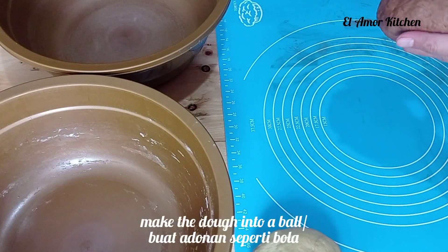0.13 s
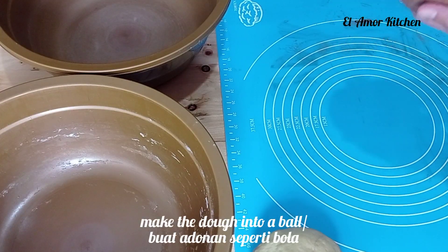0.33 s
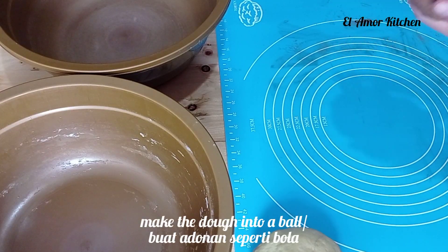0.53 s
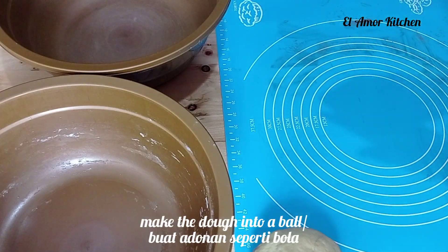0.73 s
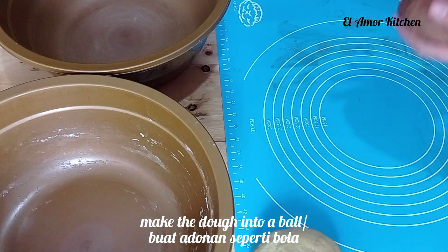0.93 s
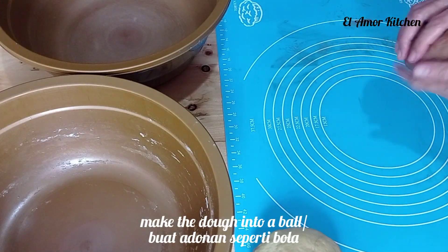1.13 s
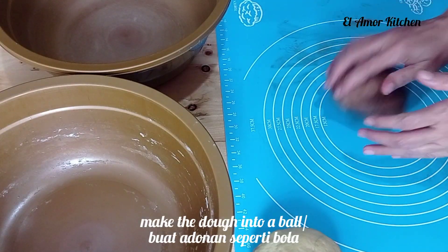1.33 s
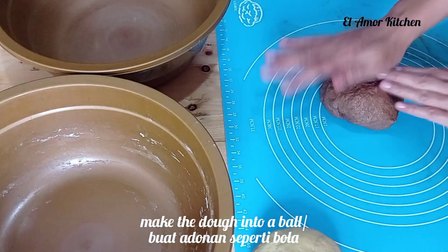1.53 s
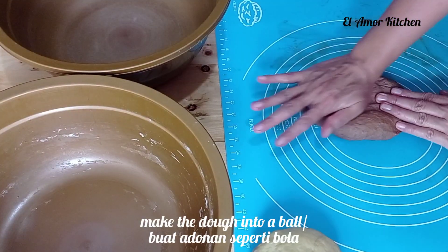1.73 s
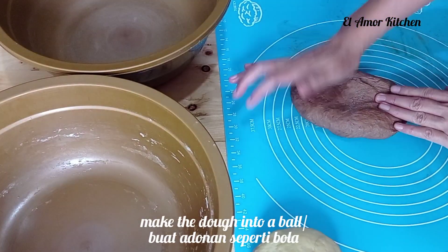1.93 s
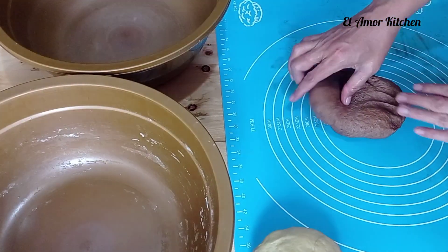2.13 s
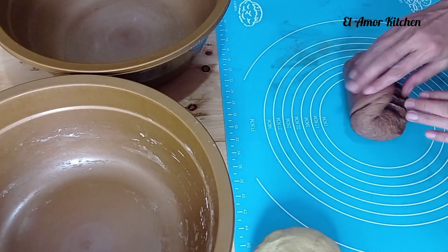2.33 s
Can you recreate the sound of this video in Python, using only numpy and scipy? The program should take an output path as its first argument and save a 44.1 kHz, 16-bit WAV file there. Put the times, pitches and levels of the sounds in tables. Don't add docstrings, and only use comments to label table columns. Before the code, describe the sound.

A soft ball of dough drops onto a silicone mat with a dull smack and woody thud

```python
import sys
import numpy as np
from scipy import signal
from scipy.fft import rfft, irfft, next_fast_len
from scipy.io import wavfile
from scipy.ndimage import uniform_filter1d, map_coordinates

SR = 44100
rng = np.random.default_rng(int(sys.argv[2]) if len(sys.argv) > 2 else 0)


def level_to_linear(level):
    exponent = np.asarray(level, float) / 20
    return 10 ** exponent


def bounce(signal):
    frames = np.transpose(np.atleast_2d(signal))
    limited = np.clip(frames, -1, 1)
    pcm = np.round(limited * 32767).astype(np.int16)
    wavfile.write(sys.argv[1], SR, pcm)


N = 108794
TIME_S = np.arange(N) / SR


def unit(x):
    return x / np.sqrt(np.mean(x ** 2) + 1e-20)


def along(points, hz):
    f, v = np.transpose(points)
    return np.interp(np.log(hz + 1), np.log(f + 1), v)


def filtered(x, response):
    m = next_fast_len(len(x) + 8192)
    return irfft(rfft(x, m) * response(np.fft.rfftfreq(m, 1 / SR)), m)[:len(x)]


def resonant(x, peaks):
    def response(f):
        total = 0
        for k, (centre, width, db) in enumerate(peaks):
            damping = 1j * f * width
            total = total + (-1) ** k * level_to_linear(db) * damping / (centre * centre - f * f + damping)
        return total
    return filtered(x, response)


def hiss(spectrum):
    return unit(filtered(rng.standard_normal(N), lambda hz: level_to_linear(along(spectrum, hz))))


def wobble(rate):
    knots = rng.standard_normal(int(N * rate / SR) + 4)
    return map_coordinates(knots, [np.arange(N) * rate / SR])


def strike(s, rise_s, t60):
    t = np.maximum(TIME_S - s, 0)
    return (1 - np.exp(-t / rise_s)) * level_to_linear(-60 * t / t60)


def swell(s, half_s):
    return np.exp(-((TIME_S - s) / half_s) ** 2)


def streaky(x, depth_db):
    z = signal.stft(x, nperseg=512)[2]
    field = rng.standard_normal(z.shape)
    field = uniform_filter1d(uniform_filter1d(field, 2, 0), 16, 1)
    return signal.istft(z * level_to_linear(depth_db * unit(field)), nperseg=512)[1][:N]


# f/Hz, width/Hz, level/dB
HUM = [(148.5, 6, -65.5), (241.6, 4, -83), (494, 2.6, -72), (2845, 26, -94.5), (1750, 220, -99)]
# t/s, f/Hz, level/dB
WHINE = [(.55, 1650, -100), (.7, 1800, -87), (.85, 1900, -84), (1.0, 1950, -106), (2.1, 1400, -104),
         (2.2, 1500, -90), (2.3, 1550, -102)]
# f/Hz, level/dB (per Hz)
AIR = [(30, -47), (76, -17.5), (150, -7.5), (392, -17.5), (560, -19.5), (900, -32), (3000, -40.5),
       (8000, -51), (13000, -61)]


def kitchen():
    hum = np.zeros(N)
    for hz, width_hz, db in HUM:
        tone = 1.88 * np.sin(2 * np.pi * hz * TIME_S + 1.24 * wobble(4.39))
        band = unit(resonant(rng.standard_normal(N), [(hz, width_hz, 0)]))
        hum += level_to_linear(db) * unit(tone + band)
    s, hz, db = np.transpose(WHINE)
    level = level_to_linear(np.interp(TIME_S, s, db)) * wobble(350)
    pitch = np.interp(TIME_S, s, hz) + 160 * wobble(150)
    whine = level * np.sin(2 * np.pi * np.cumsum(pitch) / SR)
    air_db = -67 + 0.7 * wobble(7.8)
    return hum + whine + level_to_linear(air_db) * unit(streaky(hiss(AIR), depth_db=2.5))


# t/s (middle), level/dB, half length/s, f/Hz
SLIDES = [(0.024, -59, 0.0086, 251), (0.146, -71.5, 0.0072, 7500), (0.154, -75.5, 0.013, 5420),
          (0.203, -86.5, 0.032, 2810), (0.212, -69, .04, 83.6), (0.673, -83, .01, 5640),
          (0.676, -81, 0.0074, 7320), (0.71, -86, 0.014, 4800), (.725, -88, .012, 5660),
          (0.795, -77, .012, 6770), (0.817, -91, 0.094, 5140), (0.805, -82.5, 0.078, 1860),
          (0.872, -92, 0.037, 2950), (1, -65, 0.024, 428), (1.26, -72, 0.045, 750),
          (1.727, -76, 0.043, 1250), (1.777, -86, 0.07, 1704), (1.843, -58, 0.029, 261.5),
          (1.918, -77, 0.0088, 7100), (1.931, -78, 0.019, 3934), (1.923, -77, 0.016, 5900),
          (1.963, -60.5, 0.034, 333), (1.972, -78, 0.062, 883), (1.968, -76, 0.032, 1696),
          (1.977, -76, 0.011, 3950), (2.004, -80, 0.057, 2760), (2.054, -87, .02, 4050),
          (2.078, -67, 0.04, 85), (2.069, -66.5, 0.0056, 1299), (2.166, -81, 0.031, 1406),
          (2.208, -76, 0.029, 1523), (2.213, -83.5, 0.037, 3920), (2.195, -84, 0.017, 8900)]


def slides():
    rough, flutter_db = 0.09, 4.5
    out = np.zeros(N)
    for s, db, half_s, hz in SLIDES:
        rate = 40 + hz * rough
        pitch = hz * (1 + rough * 0.5 * wobble(rate))
        level = level_to_linear(db + flutter_db * wobble(rate / 2)) * swell(s, half_s)
        out += level * np.sin(2 * np.pi * np.cumsum(pitch) / SR)
    return out


# f/Hz, T60/s
KITCHEN = [(100, 0.61), (500, 0.72), (2000, 0.56), (5000, 0.57), (9000, 0.46), (14000, 0.31)]


def room(x):
    wall_s = 0.003
    hz, t, z = signal.stft(rng.standard_normal(SR), SR, nperseg=256)
    decay = level_to_linear(-60 * t / along(KITCHEN, hz)[:, None])
    tail = signal.istft(z * decay, SR, nperseg=256)[1]
    delayed = np.pad(x, (round(wall_s * SR), 0))
    return signal.fftconvolve(delayed, tail / np.linalg.norm(tail))[:N]


def wash(s, spectrum, peaks=()):
    blow = np.zeros(N)
    blow[round(s * SR)] = SR
    tail = filtered(room(blow), lambda hz: level_to_linear(along(spectrum, hz)))
    if len(peaks):
        tail = tail + 1.805 * resonant(tail, peaks)
    return tail * strike(s, 0.0015, t60=SR)


# t/s, level/dB, f/Hz, T60/s
TICKS = [(0.0256, -60, 5300, 0.0096), (0.344, -76, 3660, 0.014), (.635, -63, 4400, 0.011),
         (.652, -73, 5500, .008), (0.67, -59.5, 5670, 0.0078), (0.704, -71.5, 5290, 0.015),
         (0.7737, -71, 8800, 0.011), (0.792, -62.5, 5420, 0.016), (1.789, -64, 6500, 0.018),
         (1.915, -65, 5800, 0.01), (1.949, -55, 8800, 0.012), (1.963, -56, 6350, 0.012),
         (2.196, -68, 6500, 0.014), (2.278, -74, 6650, 0.0093)]
# t/s (middle), level/dB, half length/s, f/Hz (centre), body level/dB
BRUSHES = [(0.152, -74.5, 0.015, 6800, -11), (0.348, -85.5, 0.021, 6000, -5),
           (0.513, -77, 0.019, 6500, -15), (0.71, -83.5, 0.077, 5500, -3), (0.77, -90, .025, 14800, -28),
           (0.782, -77, 0.021, 7600, -9), (1.274, -84, 0.18, 7800, -17), (1.736, -82, 0.043, 6500, 10),
           (1.816, -85, 0.043, 6500, -3), (1.937, -77, 0.019, 6500, 7.5), (1.958, -65.5, 0.021, 6300, 0),
           (1.981, -76, 0.058, 6500, 9), (2.22, -84, 0.067, 6500, 1.5), (2.285, -83, 0.026, 7200, -1)]
# f/Hz, level/dB (per Hz)
BRUSH_BODY = [(150, 4), (350, 3), (900, -0.5), (1100, -18), (4000, -12), (6000, -37)]
# f/Hz, width/Hz, level/dB
SQUEAK = [(1180, 90, -5), (1730, 60, -5), (1940, 70, -8), (2840, 90, -4), (4020, 170, 1), (5210, 90, 0),
          (6530, 250, -10), (600, 80, 0)]


def fingers():
    out = np.zeros(N)
    for s, db, half_s, hz, body_db in BRUSHES:
        band = [(hz, hz / 1.55, 0)]
        rub = rng.standard_normal(N)
        for _ in range(3):
            rub = resonant(rub, band)
        rub = unit(rub) + level_to_linear(body_db) * hiss(BRUSH_BODY)
        out += level_to_linear(db + 3.5 * wobble(370)) * swell(s, half_s) * rub
    for s, db, hz, t60 in TICKS:
        narrow = resonant(rng.standard_normal(N), [(hz, hz / 14, 0)])
        tone = strike(s, 0.0021, t60) * unit(resonant(narrow, [(hz, hz / 8, 0)]))
        snap = 0.5 * strike(s, 0.00026, 0.012) * hiss(PAT)
        out += level_to_linear(db + 1.0) * (tone + snap)
    squeak = resonant(rng.standard_normal(N), SQUEAK)
    squeak = unit(resonant(squeak, [(hz, width_hz * 2, 0) for hz, width_hz, db in SQUEAK]))
    out += level_to_linear(-71) * swell(1.306, 0.059) * squeak
    return out + level_to_linear(-14) * room(out)


# f/Hz, level/dB, T60/s
TABLE = [(92.1, 2.5, 0.22), (120.1, -1.5, 0.43), (161.6, -6, 0.8), (222, -12.5, 0.25), (240, -15, 0.88),
         (309.4, -10, 0.45), (333.2, -0.5, 0.19), (404, -5.5, 0.27), (540, -36, 0.17), (618.7, -6, 0.2),
         (722, -27, 0.31), (779, -20, 0.52), (906.4, -22.5, 0.25), (1170, -32, 0.22)]


def ring(s, rise_s, weight):
    t = TIME_S - s
    out = np.zeros(N)
    for hz, db, t60 in TABLE:
        level = level_to_linear(db + rng.normal(0, 1)) * weight(hz)
        drift = 0.86 * np.clip(t / 0.09, 0, 1) * wobble(18)
        out += level * strike(s, rise_s, t60) * np.sin(2 * np.pi * hz * t + drift)
    return out


# t/s, level/dB, rise/s, f/Hz (centre)
PRESSES = [(0.221, -63, .02, 240), (0.751, -36, 0.037, 244), (0.938, -43, 0.035, 101),
           (1.131, -63, 0.0079, 89), (1.203, -48.5, 0.014, 340), (1.699, -54, 0.0058, 174),
           (1.767, -40.5, 0.013, 210), (1.848, -33, 0.044, 260), (1.961, -37, 0.0201, 101),
           (1.95, -39, 0.014, 266), (2.039, -42, 0.011, 166), (2.11, -49, 0.0091, 98)]


def presses():
    out = np.zeros(N)
    for s, db, rise_s, mid_hz in PRESSES:
        start = s - rise_s
        modes = ring(start, rise_s, lambda hz: 1 / (1 + (4 * np.log(hz / mid_hz)) ** 2))
        out += level_to_linear(db) * modes * strike(start, rise_s, 0.35)
    return out


# t/s, level/dB, lead-in/s, length/s, body level/dB
PATS = [
    (.9212, -46, .0072, .008, 1),
    (1.1147, -46, .0048, .002, -24),
]
# f/Hz, level/dB (per Hz)
PAT = [(400, -8), (1000, -13), (1700, -10), (3200, -10.5), (4300, -9), (7200, -10), (12500, -27),
       (15800, -33.5)]
# f/Hz, level/dB, T60/s
PALM = [(435, -2, .045), (345, -8, .04), (620, -14, .03)]


def pats():
    out = np.zeros(N)
    for s, db, lead_s, long_s, body_db in PATS:
        middle = s + long_s / 2
        shape = (TIME_S > s) * np.exp(-((TIME_S - s - long_s / 2) / long_s * 3.8) ** 2)
        shape = shape + 0.74 * strike(middle, 0.00023, 0.054)
        touch = s - lead_s
        lead_shape = strike(touch, 0.00018, 0.021) + 0.52 * strike(touch, 0.0025, 0.15)
        lead = level_to_linear(-12) * lead_shape * unit(resonant(hiss(PAT), [(5500, 18000, 0)]))
        palm = np.zeros(N)
        for hz, level, t60 in PALM:
            palm += level_to_linear(level) * strike(s, 0.00082, t60) * np.sin(2 * np.pi * hz * (TIME_S - s))
        palm *= level_to_linear(db + body_db)
        slap = shape * hiss(PAT) * level_to_linear(3 * wobble(900))
        slap *= 1.36 * np.linalg.norm(shape) / np.linalg.norm(slap)
        out += level_to_linear(db) * (slap + lead) + palm + 1.8 * room(palm)
        out += level_to_linear(db - 50.5) * long_s ** 0.5 * 7 * wash(s, PAT)
    return out


# f/Hz, level/dB (per Hz)
CRACK = [(500, -30), (1000, -4), (2000, 1), (3000, -4), (6000, -5), (9000, -17), (12000, -30), (15800, -50)]
# f/Hz, level/dB (per Hz)
THUD = [(45, -37), (90, -11), (190, -0.5), (630, -15.5), (900, -13.5), (1050, -56), (1300, -29),
        (2500, -44), (5000, -100)]
# f/Hz, level/dB (per Hz)
SMACK = [(710, -16), (1200, 5.5), (1710, -4), (3250, -14), (3810, -10), (4980, -11.5), (6510, -3.5),
         (10800, -26), (15500, -48)]
# f/Hz, width/Hz, level/dB
MAT = [(3680, 650, 1.5), (6500, 5300, -0.5), (2840, 430, -2), (4770, 300, -6.5)]


def drop():
    s, settle_s, rise_s = 1.3893, 0.0082, 0.002
    first = ring(s, rise_s, lambda hz: 1 / (1 + (110 / hz) ** 2))
    bulk = level_to_linear(3.5) * ring(s + settle_s, rise_s, lambda hz: 1 / (1 + (hz / 300) ** 2))
    boom = level_to_linear(-30) * (first + bulk)
    push = level_to_linear(-23) * strike(s, 0.00059, 0.04) * np.sin(2 * np.pi * 245 * (TIME_S - s))
    thud = level_to_linear(-30) * hiss(THUD) * strike(s, 0.00032, 0.06)
    contact = strike(s, 0.0008, 0.010) + 0.12 * strike(s - 0.004, 0.002, 0.03)
    smack = level_to_linear(-27) * hiss(CRACK) * contact
    modes = [(hz, 12, 1.5) for hz, db, t60 in TABLE]
    thud_wash = level_to_linear(-76) * wash(s, THUD, modes)
    smack_wash = level_to_linear(-96) * streaky(wash(s, SMACK, MAT), depth_db=2.0) * strike(s, 0.001, t60=SR)
    return boom + push + thud + smack + thud_wash + smack_wash


def scene():
    hands = streaky(pats(), depth_db=2.5) + streaky(fingers(), depth_db=3)
    return (kitchen() + slides() + presses() + hands + drop())[None]


def roll_off(x):
    return signal.sosfilt(signal.butter(12, 16290, fs=SR, output="sos"), x)


# f/Hz, level/dB
MIC = [(40, -13), (62, -3.5), (85, 0.5), (9000, 0), (13000, -8), (14300, 3), (15200, 8)]


def record(dry):
    rumble = hiss([(20, -11.5), (60, -6.0), (90, -41)])
    own = level_to_linear(-97) * (rng.standard_normal(N) + 2.5 * rumble)
    heard = filtered(dry[0], lambda hz: level_to_linear(along(MIC, hz))) + own
    mix = filtered(heard, lambda hz: hz < 15850)[None]
    return roll_off(mix)


dry = scene()
out = record(dry)
bounce(out)
```